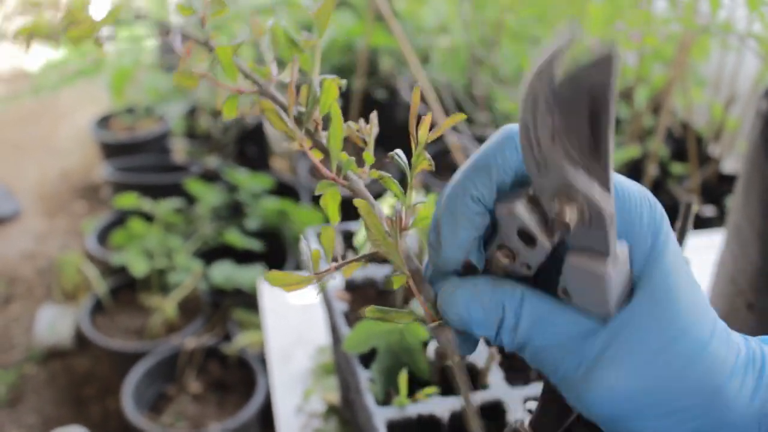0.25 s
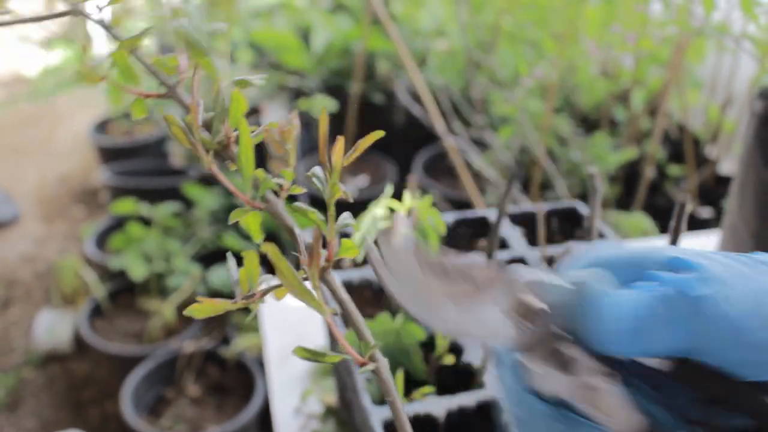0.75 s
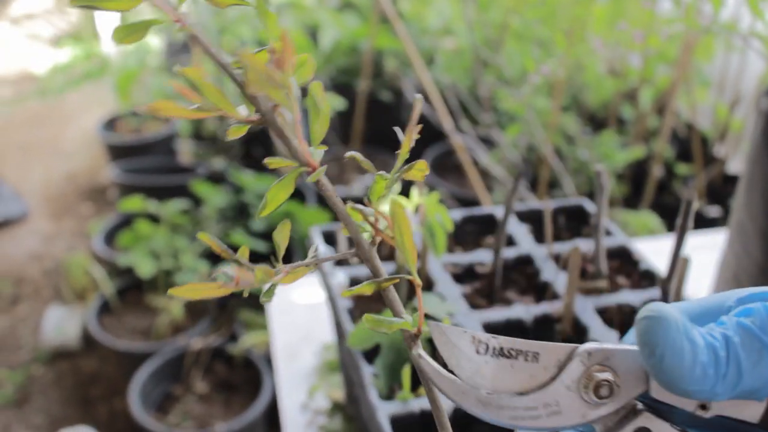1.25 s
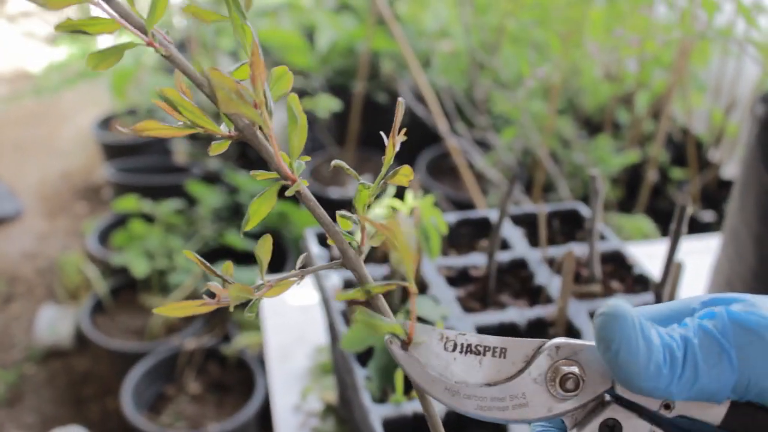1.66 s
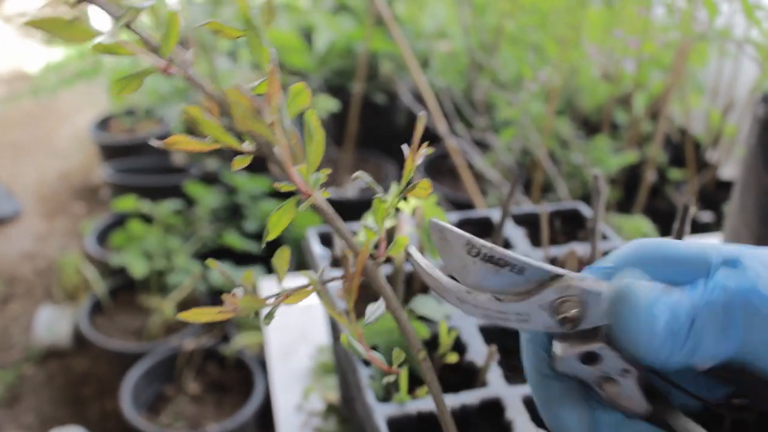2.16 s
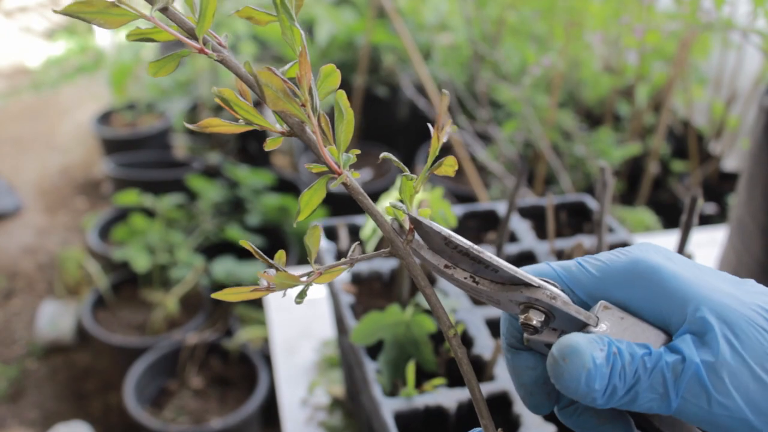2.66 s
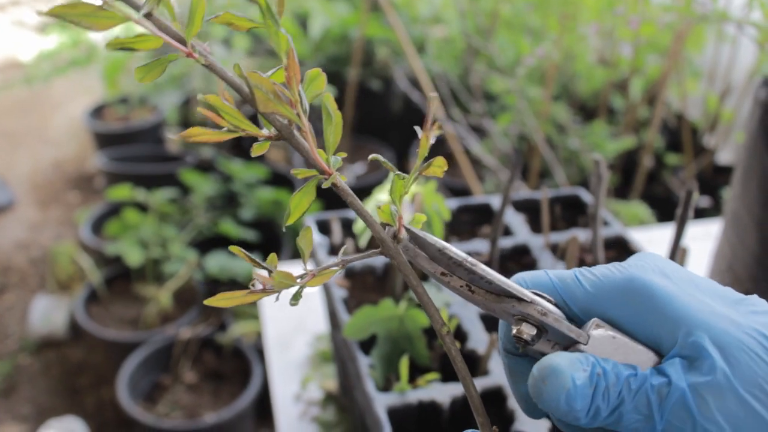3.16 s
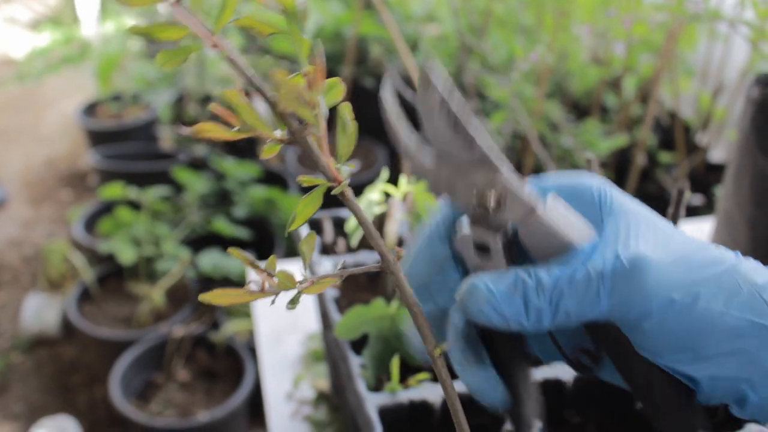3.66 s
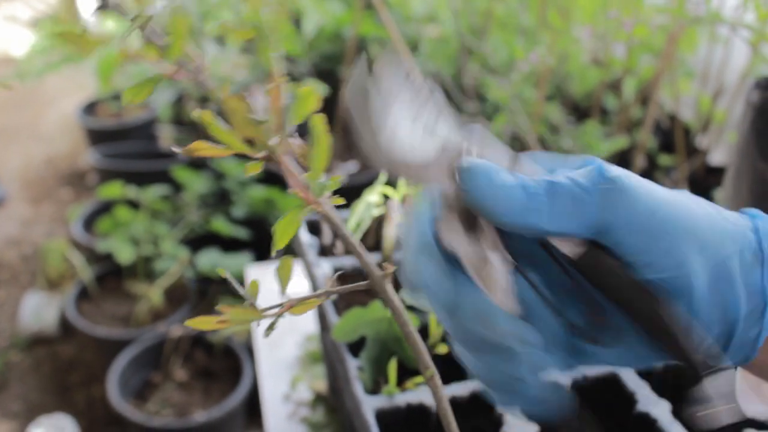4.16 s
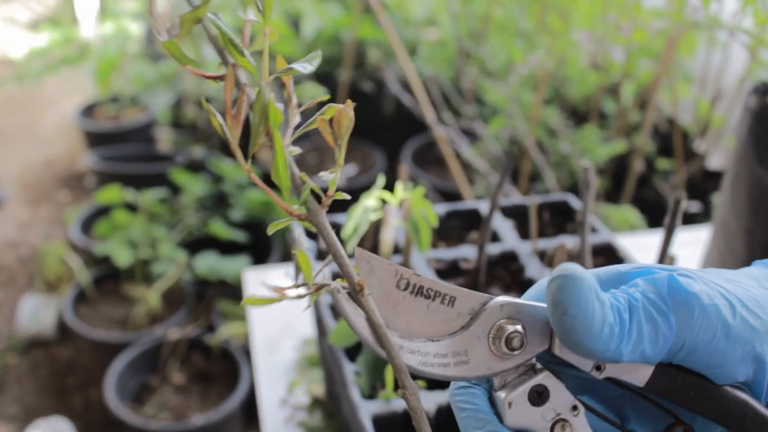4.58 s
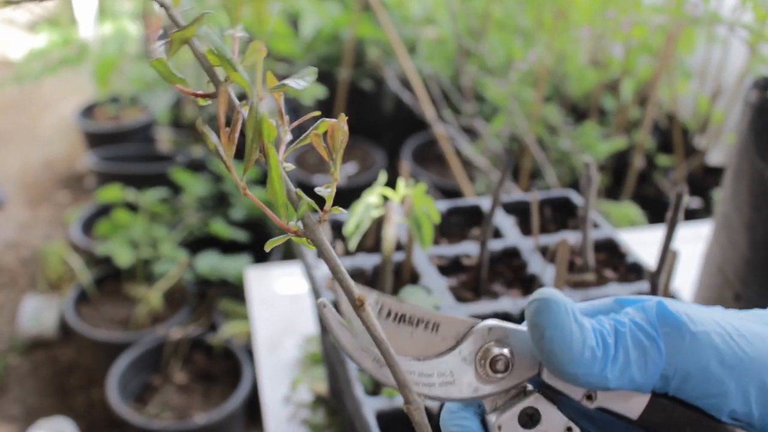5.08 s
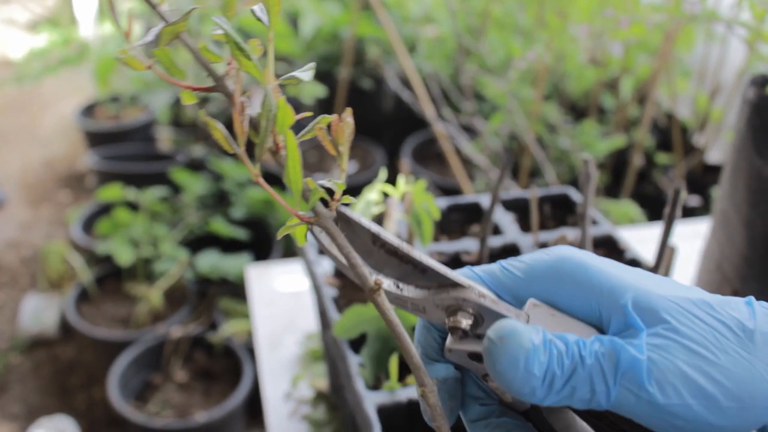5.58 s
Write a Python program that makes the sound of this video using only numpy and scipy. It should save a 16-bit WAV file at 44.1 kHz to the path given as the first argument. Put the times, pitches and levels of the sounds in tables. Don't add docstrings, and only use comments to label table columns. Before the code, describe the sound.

A calm garden: steady soft hiss, faint leaf rustle, light wind bumps and a far crowd of chirping birds, with a few clearer calls around 2.1, 3.5 and 4.4 seconds. Very close, pruning shears tick and creak lightly from 0.2, then spring open in a quick grainy ratchet at 0.7 with a tiny squeak near 0.95. Blades touch softly at 1.1. The first cut comes at 1.7 to 1.76: knocks, a brief metallic squeal, splitting wood and a grating nip. Small clicks follow at 2.0 and 2.6. A second short, bright snip lands at 3.3 to 3.36, then handles creak at 3.6 and a longer ratcheting release runs at 3.9. Handling clicks and rubs build from 4.35 to a loud, sharp crack at 4.88, with dull thump, ringing steel and handle clap with tiny rebounds. Faint squeaks and creaks follow near 5.1; final knocks at 5.8 join swelling rustle.

```python
import sys
import numpy as np
from scipy import signal
from scipy.fft import rfft, irfft
from scipy.io import wavfile
from scipy.ndimage import uniform_filter1d

SR = 44100
rng = np.random.default_rng(int(sys.argv[2]) if len(sys.argv) > 2 else 0)


def rack_gain(trim_db):
    fader = np.asarray(trim_db, float)
    return 10 ** (fader / 20)


def wav_out(sig):
    wavfile.write(sys.argv[1], SR, np.round(np.clip(np.atleast_2d(sig).T, -1, 1) * 32767).astype(np.int16))


N = 257629


def evened(x):
    return x / np.sqrt(np.mean(x ** 2) + 1e-20)


def read(points, hz):
    f, value = np.transpose(points)
    return np.interp(np.log(hz + 1), np.log(f + 1), value)


def curves(rows, t):
    s, *columns = np.transpose(rows)
    return [np.interp(t, s, c) for c in columns]


def add(mix, s, sound):
    part = mix[max(round(s * SR), 0):][:len(sound)]
    part += sound[:len(part)]


def played(rows, source, lead_s=0):
    mix = np.zeros(N)
    for s, *row in rows:
        add(mix, s - lead_s, source(*row))
    return mix


def ring(clicks, modes, handle_hz):
    out = 0
    for hz, width, db, follow in modes:
        pitch = hz * (handle_hz / 1900) ** follow
        turn = np.exp(2j * np.pi * np.cumsum(pitch) / SR)
        r = np.exp(-np.pi * width / SR)
        out = out + rack_gain(db) * (turn * signal.lfilter([1], [1, -r], clicks / turn)).imag
    pitches = [m[0] for m in modes]
    edges = .8 * min(pitches), min(1.25 * max(pitches), .45 * SR)
    return signal.sosfilt(signal.butter(2, edges, "band", fs=SR, output="sos"), out)


def noise(db_field, patchy_db, size):
    frames, hz = N * 4 // size + 5, np.fft.rfftfreq(size, 1 / SR)
    a, b, patches = rng.standard_normal((frames, len(hz), 3)).T
    patches = uniform_filter1d(patches, size=8, axis=0)
    patches = evened(uniform_filter1d(patches, size=10, axis=1))
    db = db_field(hz[:, None], np.arange(frames) * size / 4 / SR) + patchy_db * patches
    return evened(signal.istft((a + 1j * b) * rack_gain(db), nperseg=size, noverlap=size * 3 // 4)[1][:N])


def echoes(x, t60s, start):
    taps = np.zeros(SR // 2)
    at = np.arange(round(start * SR), len(taps) - 20, 20)
    taps[at + rng.integers(0, 20, len(at))] = rng.choice([-1., 1.], len(at))
    hz, t, z = signal.stft(taps, SR, nperseg=128)
    tail = signal.istft(z * rack_gain(-60 * t / read(t60s, hz)[:, None]), SR, nperseg=128)[1]
    return signal.fftconvolve(x, tail / np.linalg.norm(tail))[:N]


# frequency [Hz], level [dB per Hz].
HISS = [(880, -19), (1500, -23), (2720, -10), (2880, -20), (3120, -3.5), (5440, -11), (6500, -17.5),
        (8740, -19), (16000, -37)]
# frequency [Hz], level [dB per Hz].
RUSTLE = [(59, -57), (100, -15.5), (261, -1), (387, 0.5), (866, -1.5), (1200, -2.5), (1310, -2.5),
          (2340, -8), (3020, -12), (6000, -24), (7800, -29), (13200, -52)]
# time [s], level [dB], brightness [dB an octave].
WEATHER = [(0.0, -54, 0), (0.31, -57, -3.5), (0.45, -51.5, -1.5), (0.53, -56.5, -2), (1.1, -60.5, -0.5),
           (1.18, -54, 0.2), (1.41, -53.5, -0.5), (1.85, -55.5, 2.5), (2.15, -58.5, -1.5),
           (2.88, -57.5, -1.6), (3.05, -61, 1.5), (4.1, -58, -1.5), (4.5, -52.5, -1), (4.86, -52, 1),
           (4.92, -59, 1.5), (5.38, -50.5, -2.5), (5.58, -50, 0.5), (5.78, -43.5, 1.5)]
# frequency [Hz], level [dB per Hz].
WIND = [(12, -38), (20, -26), (59, 13), (92, -4), (160, 7.5), (210, -63), (350, -120)]
# time [s], peak [dB].
GUSTS = [(.31, -67), (.45, -69), (1.82, -77), (3.09, -75), (3.72, -68), (4.0, -54), (4.12, -64),
         (4.42, -72), (4.86, -73), (5.07, -72), (5.76, -69)]
BREEZE_DB, GUST_S = -73, 0.034


def garden():
    now = np.arange(N) / SR
    gusts = rack_gain(BREEZE_DB) + sum(rack_gain(db) * np.exp(-((now - s) / GUST_S) ** 2) for s, db in GUSTS)

    def rustle_colour(hz, t):
        brightness = np.clip(curves(WEATHER, t)[1], -4, 3)
        return read(RUSTLE, hz) + brightness * np.log2((hz + 50) / 600)

    hiss = noise(lambda hz, t: read(HISS, hz) + 0 * t, patchy_db=.6, size=512)
    rustle = noise(rustle_colour, patchy_db=2.0, size=512)
    wind = noise(lambda hz, t: read(WIND, hz) + 0 * t, patchy_db=-4.0, size=2048)
    crackle = evened(uniform_filter1d(rng.standard_normal(N), size=120))
    rustle_db = curves(WEATHER, now)[0]
    rustle_db = rustle_db + 0.17 * np.clip(rustle_db + 57, 0, None) * crackle
    return rack_gain(-61) * hiss + rack_gain(rustle_db + 1.0) * rustle + gusts * wind


def note(length, first_hz, last_hz, warble):
    u = np.linspace(0, 1, round(length * SR))
    hz = first_hz * (last_hz / first_hz) ** u * (1 + warble)
    return np.sin(2 * np.pi * np.cumsum(hz) / SR) * np.sin(np.pi * u) ** 0.34


# time [s], level [dB].
CHORUS = [(0.0, -51), (0.35, -54.5), (0.99, -55.5), (1.27, -62), (1.46, -58), (1.67, -50), (2.03, -61),
          (2.18, -55.5), (2.49, -53), (2.62, -59.5), (3.15, -55), (3.68, -49), (3.92, -63.5), (4.3, -55),
          (4.48, -63), (5.16, -58), (5.38, -65), (5.84, -48.5)]
CHORUS_HZ = 3692
# start [s], length [s], first and last pitch [Hz], level [dB].
CHIRPS = [(0.05, 0.061, 4220, 4630, -50), (0.095, 0.11, 3924, 3040, -51), (0.823, 0.081, 3920, 2950, -51.5),
          (1.431, 0.032, 5200, 3600, -54.5), (1.787, 0.072, 3550, 4030, -53),
          (2.075, 0.11, 4410, 2730, -49.5), (2.113, .017, 3980, 3880, -48), (2.134, .014, 3380, 3300, -49),
          (2.206, 0.12, 4605, 2643, -47.5), (3.028, 0.13, 4160, 2890, -53), (3.085, .05, 4200, 3900, -54),
          (3.487, .022, 3800, 4600, -51), (3.513, .014, 4300, 3900, -43), (3.535, .02, 3200, 4100, -49),
          (3.557, .009, 3400, 3200, -46), (3.634, 0.052, 3780, 4830, -46.5),
          (3.666, .05, 4204, 2410, -48.5), (3.72, 0.041, 3720, 3080, -49.5), (4.138, 0.14, 4200, 2984, -57),
          (4.408, .016, 3000, 4900, -52), (4.431, .017, 4400, 3700, -47), (4.444, .012, 4300, 5250, -51),
          (4.452, .022, 4900, 3700, -48), (4.497, .047, 3720, 3900, -48), (5.219, 0.13, 4206, 2967, -48.5)]
# frequency [Hz], t60 [s].
CHIRP_ECHO = [(2000, 0.15), (4000, 0.37), (7000, 0.1)]


def birds(count=1100):
    crowd, calls = np.zeros((2, N))
    for place, length, off, off2, glide, size in rng.random((count, 6)):
        middle = CHORUS_HZ * 2 ** (.52 * (off + off2 - 1))
        sound = note(.006 + .016 * length, middle, middle * (.78 + .3 * glide), 0)
        add(crowd, place * N / SR, rack_gain(10 * size) * sound)
    for s, length, first_hz, last_hz, db in CHIRPS:
        wobbles = rng.standard_normal((2, round(length * SR)))
        hoarse, throb = evened(uniform_filter1d(wobbles, size=90))
        sound = note(length, first_hz, last_hz, .07 * min(length / .06, 1) * hoarse)
        add(calls, s, rack_gain(db + 3 + 4 * throb) * sound)
    crowd, calls = (x + rack_gain(-5.5) * echoes(x, CHIRP_ECHO, .006) for x in (crowd, calls))
    steady = crowd / np.sqrt(uniform_filter1d(crowd ** 2, size=2500) + 1e-9)
    return rack_gain(curves(CHORUS, np.arange(N) / SR)[0] + 0.43) * steady + calls


def brush(db, hz, octaves, dying_ms):
    t = np.arange(4096) / SR
    hump = np.exp(-(np.log2((np.fft.rfftfreq(len(t), 1 / SR) + 1) / hz) / octaves) ** 2)
    puff = evened(irfft(rfft(rng.standard_normal(len(t))) * hump))
    return rack_gain(db) * puff * np.exp(-1000 * t / dying_ms) * (1 - np.exp(-t / 0.0015))


# start [s], peak [dB], middle [Hz], width [octaves], dying time [ms].
BRUSHES = [(0.096, -43, 584, 1.1, 14), (0.409, -41.5, 500, 0.7, 30), (0.6, -49, 900, 1.6, 23),
           (1.21, -48, 450, .8, 30), (1.28, -48, 500, .9, 40), (3.71, -63, 60, .8, 18),
           (4.06, -54.5, 6400, 0.77, 31), (4.155, -46, 2420, 1.04, 10), (4.283, -44.5, 1470, 1.3, 27),
           (4.355, -48, 720, .3, 20), (4.45, -49, 750, .4, 20), (4.565, -49, 550, .7, 30),
           (4.789, -50, 275, 0.28, 58), (4.8845, -20.5, 780, 0.95, 3.16), (5.69, -45, 1300, .7, 15),
           (5.74, -42, 1000, .7, 15), (5.8, -37, 950, 0.56, 17)]


def brushes():
    return played(BRUSHES, brush)


# mode [Hz], width [Hz], level [dB],
# follow [power of the handle pitch]; the pivot and blades below alike.
HANDLES = [(1900, 58, 8, 1), (2100, 60, -6, 0.1), (1780, 44, -8, 0)]
PIVOT = [(3190, 84, 6, 0.9), (3850, 120, 0, 0.1), (4650, 310, 5.5, 0.1), (5200, 160, -3.5, 1),
         (6000, 130, -5, 0.1)]
BLADES = [(7000, 340, -25, 0.27), (8470, 266, 13.5, 0.29), (9140, 210, 3, 0.72), (10540, 580, 5, 0),
          (11800, 2500, -59, 0)]


def tick(pivot_db, handles_db, blades_db, handle_hz, rattle_ms=1.87):
    t = np.arange(2600) / SR
    blow = rng.standard_normal(len(t)) * np.exp(-1000 * t / rattle_ms)
    blow[0] = 6.9
    parts = [ring(blow, modes, handle_hz + 0 * t) for modes in (PIVOT, HANDLES, BLADES)]
    return sum(rack_gain(pivot_db + db) * p / abs(p).max() for p, db in zip(parts, (0, handles_db, blades_db)))


def touch(blades_db, handles_db, handle_hz):
    pivot_db = -16.5
    return tick(blades_db + pivot_db, handles_db - pivot_db, -pivot_db, handle_hz, 1.7)


# start [s], pivot peak [dB], handles and blades [dB re pivot],
# handle pitch [Hz].
TICKS = [(0.209, -46, -10, -8, 2090), (0.413, -40, -6, -4, 1760), (0.505, -36, -19, -13, 1810),
         (0.6779, -31, -6, -7, 1820), (1.6856, -24, -11, -1.5, 1800), (1.7175, -33, -9, 0, 1710),
         (1.732, -29, -5, -5, 1610), (2.55, -26, -9, -6.5, 2053), (2.589, -30, -19, -6.5, 1780),
         (2.594, -32.5, -12, -7, 1900), (2.6111, -35.5, -12, -3, 1750), (3.3075, -26.5, -15, -10, 1950),
         (3.3137, -27.5, -16, -4.5, 2060), (3.3158, -29, -14, -6, 1950), (3.325, -35, -8, -10, 1880),
         (3.337, -37, -20, -3, 1970), (4.35, -28.5, -5.5, -2.5, 1990), (4.6936, -31.5, -10, -3, 1820),
         (4.7509, -30.5, -14, -20, 2100), (4.769, -41.5, -15, 6.5, 1900), (4.829, -37, -10, -3, 1780),
         (4.841, -41, 0, -14, 1800), (4.8803, -30, 0, -12, 1700), (5.2005, -28.5, -12, -10, 1784),
         (5.7788, -31.5, -3, -3.5, 1780), (5.822, -27, -8, -10, 1780)]
# start [s], blades peak [dB], handles [dB re blades], handle pitch [Hz].
TOUCHES = [(0.2953, -40.5, -8, 2100), (1.066, -42, -7.5, 1830), (1.0745, -47, -8, 1830),
           (1.1018, -40, -28, 1830), (1.7004, -38, -11, 1830), (1.7127, -40, 2, 2100),
           (2.0278, -37, -11, 2120), (2.565, -36, -8, 1740), (3.8194, -54.5, -3, 2180),
           (4.814, -37, -9, 1720), (4.9014, -36, -12, 1670), (5.4658, -49, -2, 1570)]


def knocks():
    return played(TICKS, tick) + played(TOUCHES, touch)


# mode [Hz], width [Hz], level [dB], follow [power of handle pitch].
SPRING = [(4670, 170, 0, 0.073)]
# time [s], level [dB re the stroke].
SLIPS = [(.6864, 0), (.6922, -3), (.6978, 0), (.7022, -1), (.7076, 0), (.7118, 0), (.7152, -3), (.7182, -2),
         (.7228, 3), (.7266, 0), (.7306, 0), (.7346, -1), (.7378, 1), (.7416, 0), (.7461, -2), (.7541, 1),
         (.7593, 2), (.7626, 2), (.7676, -2), (.7764, 0), (.7833, 0), (.7915, -1), (.7976, 0), (.8018, 0),
         (.806, 1), (.8107, 3), (.8177, 3), (.8252, 4), (3.8822, 3), (3.8908, 3), (3.8973, 3), (3.9033, -1),
         (3.9092, -2), (3.9147, 0), (3.9183, 0), (3.923, 0), (3.9286, 1), (3.9352, 3), (3.942, -2),
         (3.9462, 2), (3.9503, -1), (3.9541, -1), (3.9579, -3), (3.9615, 0), (3.9654, 1), (3.9697, -1),
         (3.9738, 0), (3.9783, -2), (4.699, 0), (4.7056, 0), (4.7147, -4), (4.7191, 2), (4.723, 1),
         (4.7268, 2), (4.731, 0), (4.7361, -2), (4.7404, -2), (4.7436, -2), (4.7481, 2), (4.7555, 3)]
LOOSE = 1.8


def creak(rows):
    start, end = rows[0][0], rows[-1][0]
    t = np.arange(start, end + 0.013, 1 / SR)
    handles_db, blades_db, pivot_db, rate, handle_hz, spring_db = curves(rows, t)
    wobble, size, grind = rng.standard_normal((len(t), 3)).T
    rate = rate * (1 - 0.44 * np.exp(-(t - t[0]) / 0.018))
    rate = rate * handle_hz / 1800
    turns = np.cumsum(rate * (1 + .1 * evened(uniform_filter1d(wobble, size=250)))) / SR
    slips = np.diff(np.floor(turns + .9), prepend=0) * rack_gain(1.5 * size)
    listed = [(round((s - t[0]) * SR), db) for s, db in SLIPS if t[0] <= s < end]
    long_stroke = len(listed) > 2
    if long_stroke:
        slips = np.bincount([at for at, db in listed], [rack_gain(db) for at, db in listed], len(t))
    scuff = signal.lfilter([1], [1, -.96], slips) * grind
    drive = (1.1 * slips + .22 * scuff + .09 * grind * rate / 170) * (t < end)
    loose = LOOSE if long_stroke else 1
    handles = [(hz, width * loose, db, follow) for hz, width, db, follow in HANDLES]
    pairs = (handles, handles_db), (BLADES, blades_db), (PIVOT, pivot_db), (SPRING, spring_db)
    return sum(rack_gain(db) * evened(ring(drive, modes, handle_hz)) for modes, db in pairs)


def stroke(start, length, db, handles_db, hz, voice):
    blades_db, spring_db, handles_fade, blades_fade, pivot_fade, spring_fade, rate, glide = voice
    edge = 0.0065
    s = np.array([0, edge, max(length - edge, 2 * edge), length + edge])
    grip_db, u = db + np.array([0.5, 1, 0, -6.5]), s / length
    handles = grip_db + handles_db + handles_fade * u
    blades = grip_db + blades_db + blades_fade * u
    pivot = grip_db + pivot_fade * u
    spring = grip_db + spring_db + spring_fade * u
    return np.transpose([start + s, handles, blades, pivot, rate + 0 * s, hz + glide * s, spring])


# start [s], length [s], pivot [dB],
# handles [dB re pivot], handle pitch [Hz]; the next two alike.
SQUEEZES = [
    (.41, 0.023, -58, 11.5, 1768),
    (.43, .038, -63, 11, 1770),
    (.507, 0.043, -54, 7.5, 1787),
    (1.993, 0.055, -52.5, 12, 2058),
    (3.545, .03, -62, 11, 1900),
    (3.579, 0.075, -54, 16, 2060),
    (5.108, 0.035, -60.5, 16.5, 2050),
    (5.168, 0.016, -56, 8, 2050),
]
RUBS = [(0, 0.04, -56.5, 2.5, 1788), (.232, .03, -58, -9, 1900), (.257, .042, -52, -9, 1800),
        (.715, 0.057, -39.5, -8, 1957), (.77, 0.058, -48, 1, 2030), (1.105, .04, -55, -3, 1830),
        (3.309, .038, -48, -8, 1950), (5.203, .035, -57, -5, 1800), (4.355, .035, -52, 3, 1850),
        (4.697, 0.062, -46, -10, 1980), (4.757, 0.061, -53, -6, 2030), (4.832, 0.025, -56, 1, 1800)]
RELEASES = [
    (.683, 0.037, -48.5, 2, 1832),
    (3.882, 0.099, -46, 2.5, 1757),
]
# blades and spring [dB re pivot]; fade over the stroke of handles,
# blades, pivot and spring [dB]; slips [per second]; glide [Hz per second].
SQUEEZE_VOICE = (-4, -11, -15, -12, -4, -4, 200, 101.5)
RUB_VOICE = (-9, -40, -2.5, -8, -2.5, -2.5, 230, 398.5)
RELEASE_VOICE = (-7, -5, -2.5, -4.5, 0, -8, 180, 400)


def strokes():
    mix = np.zeros(N)
    for rows, voice in (SQUEEZES, SQUEEZE_VOICE), (RUBS, RUB_VOICE), (RELEASES, RELEASE_VOICE):
        for row in rows:
            add(mix, row[0], creak(stroke(*row, voice)))
    return mix


SQUEAK_OVERTONES_DB = (0, -6, -18, 0, -4, -10)
SQUEAK_DYING_S = (.04, .012, .01, .009, .006, .005)


def squeak(length, first_hz, last_hz, db):
    t = np.arange(round(length * SR)) / SR
    phase = 2 * np.pi * np.cumsum(first_hz + (last_hz - first_hz) * t / length) / SR
    rough = 1 + .3 * evened(uniform_filter1d(rng.standard_normal(len(t)), size=40))
    overtones = enumerate(zip(SQUEAK_OVERTONES_DB, SQUEAK_DYING_S), 1)
    stack = sum(rack_gain(d) * np.exp(-t / s) * np.sin(k * phase) for k, (d, s) in overtones)
    return rack_gain(db) * stack * rough * signal.windows.tukey(len(t), .3)


# start [s], length [s], first and last pitch [Hz], level [dB].
SQUEAKS = [
    (.947, .014, 2170, 2120, -52),
    (.9715, .01, 2150, 2100, -62),
    (5.144, .024, 2160, 2090, -50),
]


def squeaks():
    return played(SQUEAKS, squeak)


def squeal(length, first_hz, last_hz, db):
    u = np.linspace(0, 1, round(length * SR))
    wobble = evened(uniform_filter1d(rng.standard_normal(len(u)), size=60))
    hz = (first_hz + (last_hz - first_hz) * u ** 1.03) * (1 + 0.0016 * wobble)
    phase = 2 * np.pi * np.cumsum(hz) / SR
    overtones = range(1, 1 + int(15000 // last_hz))
    tone = sum(rack_gain(-16.5 * np.sqrt(k - 1)) * np.sin(k * phase) for k in overtones)
    return rack_gain(db) * tone * (0.62 + 1.18 * u) * signal.windows.tukey(len(u), .35) * (1 + 0.33 * wobble)


# start [s], length [s], first and last pitch [Hz], level [dB].
SQUEALS = [
    (1.733, 0.012, 2900, 2800, -36),
    (1.746, 0.0095, 2804, 2780, -27),
    (3.348, 0.0135, 2780, 2840, -31.5),
    (4.833, 0.021, 2810, 3010, -46),
    (1.968, 0.015, 4900, 5410, -41),
    (3.553, 0.014, 4910, 5300, -42),
    (5.031, 0.01, 4350, 4650, -40),
    (5.039, 0.0076, 5000, 5200, -46),
    (4.856, .024, 2980, 2960, -54),
    (4.864, .017, 4250, 4100, -54),
]


def squeals():
    return played(SQUEALS, squeal)


# frequency [Hz], level [dB per Hz].
CRACK = [(59, -60), (100, -70), (1130, -16.5), (1610, 1.5), (3050, -1), (3940, 4), (6290, -5.5),
         (6840, -9.5), (7290, -10), (10700, -16.5), (16000, -33)]
# mode [Hz], width [Hz], level [dB], follow [power of handle pitch].
SHUT_RING = [(910, 250, -2.5, 0.021), (1066, 71, -7, 0.00056), (1570, 24.7, 0.5, 0.00093),
             (1672, 33, 5.5, 0), (1830, 37, -1, 0.0066), (2780, 83, -4, 0), (3750, 120, 0, 0.0061),
             (4350, 92, -24, 0), (5700, 130, -21, 0.014), (6400, 90, -29, 0.021), (7760, 120, -22, 0.0053),
             (9400, 48, 0, 0.021), (11360, 80, 1, 0.06)]


def snip(db, t60, ring_db, tilt_db, modes=SHUT_RING, grate=0):
    t = np.arange(6000) / SR - .01
    rise = 0.00069 * rack_gain(0.1 * (db + 25))
    hz = np.fft.rfftfreq(len(t), 1 / SR)
    colour = rack_gain(read(CRACK, hz) + tilt_db * np.log2((hz + 50) / 3000))
    fibres = evened(irfft(rfft(rng.standard_normal(len(t))) * colour))
    crack = fibres * np.where(t < 0, np.exp(t / rise), rack_gain(-60 * t / t60))
    crack = signal.sosfilt(signal.butter(2, 600, "high", fs=SR, output="sos"), crack)
    blow = (np.arange(len(t)) == round(.01 * SR)) + .05 * crack
    blow = blow + grate * fibres * (t > 0) * np.exp(-(t / .012) ** 2)
    steel = ring(blow, modes, np.ones(len(t)))
    return rack_gain(db) * (crack + rack_gain(ring_db) * steel * abs(crack).max() / abs(steel).max())


# peak [s], rms [dB], dying t60 [s], ring [dB], tilt [dB an octave].
SNIPS = [
    (1.7442, -28, 0.025, -14, -10),
    (1.7505, -28, 0.04, -19, 5.5),
    (3.36, -36, 0.0036, -17, -13.5),
    (3.363, -21, 0.015, -22, 4),
    (4.8832, -21, 0.02, -23, -6),
    (4.8872, -6.5, 0.009, -22, 3.5),
    (4.8942, -32, 0.032, -12, 1),
]
NIP = (1.7576, -20.5, .011, -7, 3)
# mode [Hz], width [Hz], level [dB].
NIP_RING = [(1030, 30, 2), (1780, 70, -8), (1980, 80, -4), (2830, 50, -3), (3410, 120, 0), (4010, 70, -3),
            (4740, 60, 0), (5250, 120, -2), (5700, 50, 0), (6620, 80, -1), (7580, 50, -2), (8400, 60, -3),
            (11400, 24, -3)]


def snips():
    nip_modes = [(*mode, 0) for mode in NIP_RING]
    mix = played(SNIPS, snip, lead_s=.01)
    add(mix, NIP[0] - .01, snip(*NIP[1:], nip_modes, grate=.3))
    return mix


# mode [Hz], width [Hz], level [dB], follow [power of handle pitch].
JOLT_RING = [(800, 170, -5, 0), (1620, 170, 0, 0), (2800, 260, -3, 0)]
JOLT_S, JOLT_DB = 4.8845, -17
PUSH_DB, PUSH_MS = -33, .6


def jolt():
    t = np.arange(2000) / SR
    body = ring(1. * (t == 0), JOLT_RING, 1900 + 0 * t) * (1 - np.exp(-t / .001))
    u = 1000 * t / PUSH_MS
    return rack_gain(JOLT_DB) * body / abs(body).max() + rack_gain(PUSH_DB) * np.e * u * np.exp(-u)


# mode [Hz], width [Hz], level [dB], follow [power].
CLAP_RING = [(1570, 26, -3, 0), (1685, 28, 0, 0)]


def clap(db):
    t = np.arange(5000) / SR
    pair = ring(1. * (t == 0), CLAP_RING, 1900 + 0 * t) * (1 - np.exp(-t / .0012))
    return rack_gain(db) * pair / abs(pair).max()


# start [s], peak [dB].
CLAPS = [
    (4.894, -23),
    (4.917, -43),
    (4.932, -42),
    (4.954, -47),
    (4.966, -48),
]


def claps():
    return played(CLAPS, clap)


def shears():
    mix = knocks() + strokes() + brushes() + snips() + claps() + squeaks()
    add(mix, JOLT_S, jolt())
    mix = mix + rack_gain(-11.5) * echoes(mix, [(500, 0.074), (4000, .12), (12000, 0.11)], .006)
    return mix + squeals()


def scene():
    return (garden() + birds() + shears())[None]


def roll_off(x):
    return signal.sosfilt(signal.butter(12, 16500, fs=SR, output="sos"), x)


# time [s], depth [dB], above [Hz].
TREBLE_DIPS = [
    (.058, -17, 5300),
    (.175, -29, 6300),
    (.462, -16, 6300),
    (1.124, -14, 9700),
    (1.85, -15, 5200),
    (1.935, -15, 6000),
    (2.853, -14, 5040),
    (3.535, -19, 5600),
]
# low edge [Hz], high edge [Hz].
THIN_BANDS = [(0, 880), (1150, 1400), (2300, 2650), (3000, 3150), (5900, 6350), (6900, 7300), (7900, 8150),
              (8900, 11000), (11750, 20000)]
THIN_S, THIN_HALF_S, THIN_DB = 1.764, .011, -26
MIC_EDGE_HZ = 15600


def record(dry):
    edge = signal.firwin(255, MIC_EDGE_HZ, fs=SR)[None]
    x = signal.oaconvolve(0.45 * np.tanh(dry / 0.49), edge, "same")
    hz, t, z = signal.stft(x, SR, nperseg=512, noverlap=384)
    dip_db = 0
    for s, db, above in TREBLE_DIPS:
        dip_db = dip_db + db * (hz[:, None] > above) * np.exp(-((t - s) / (0.00045 * db)) ** 4)
    thin = sum((hz > low_hz) * (hz < high_hz) for low_hz, high_hz in THIN_BANDS)
    dip_db = dip_db + THIN_DB * thin[:, None] * np.exp(-((t - THIN_S) / THIN_HALF_S) ** 4)
    mix = signal.istft(z * rack_gain(dip_db), SR, nperseg=512, noverlap=384)[1][:, :N]
    return roll_off(mix)


dry = scene()
out = record(dry)
wav_out(out)
```